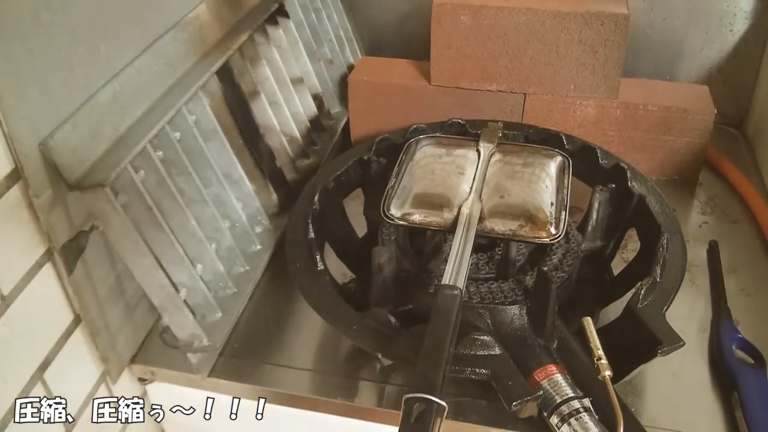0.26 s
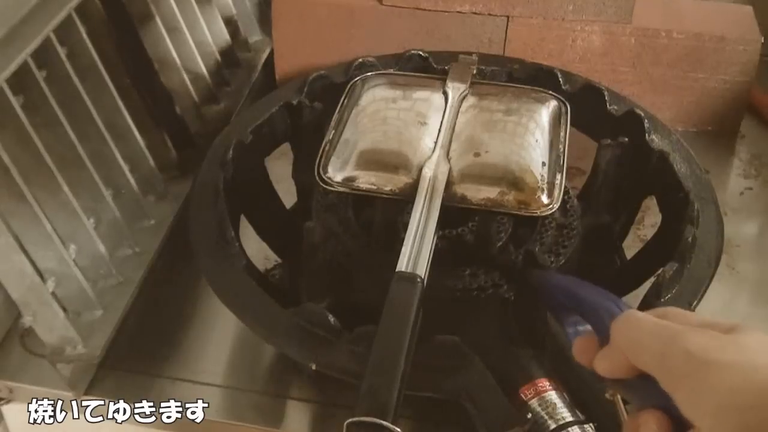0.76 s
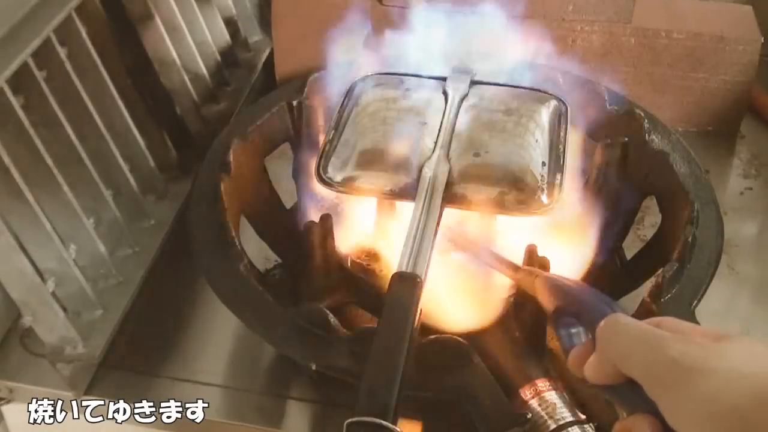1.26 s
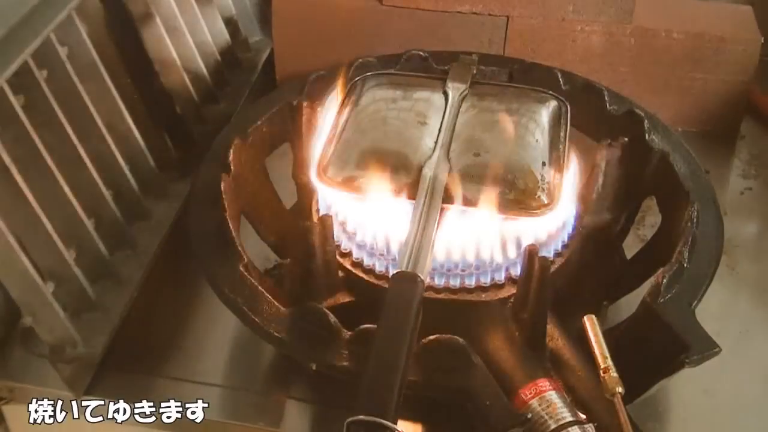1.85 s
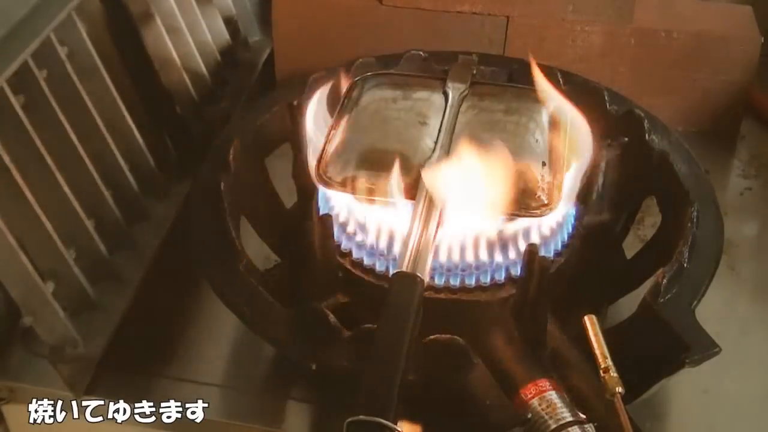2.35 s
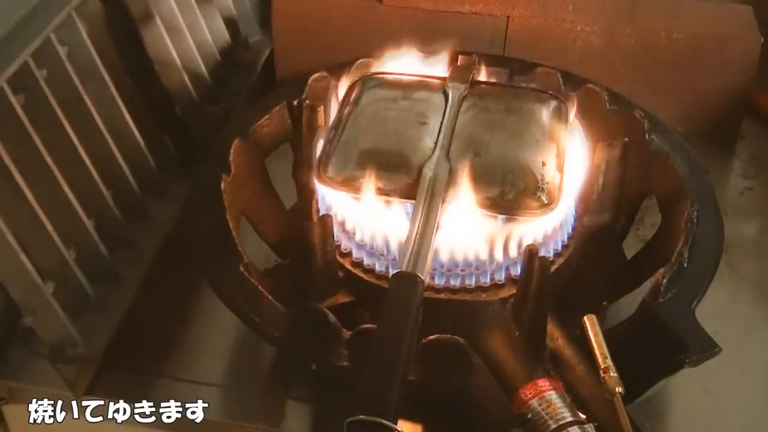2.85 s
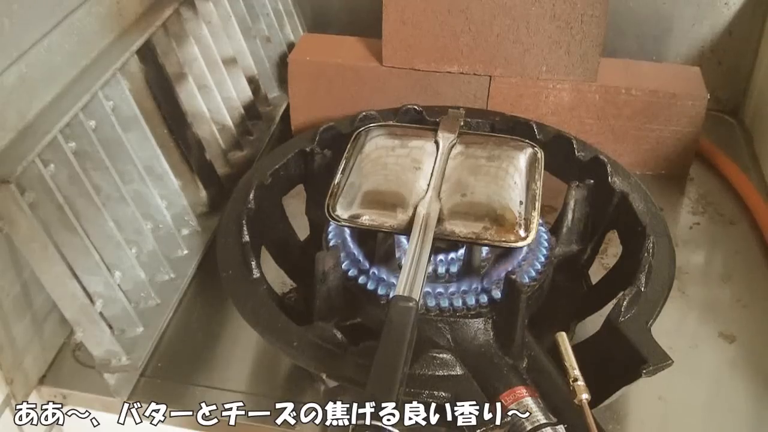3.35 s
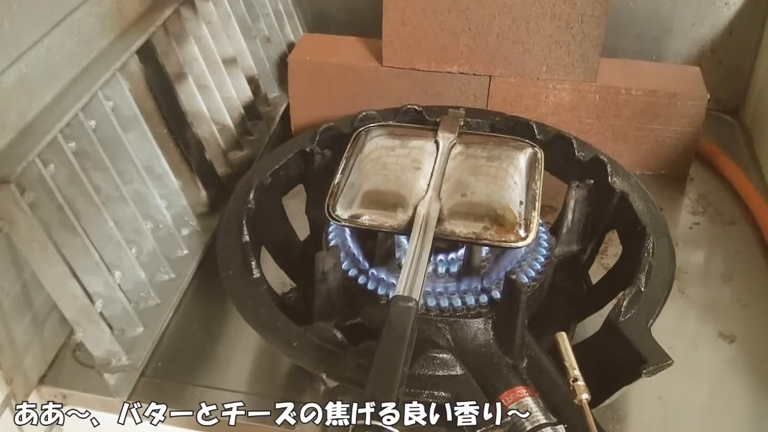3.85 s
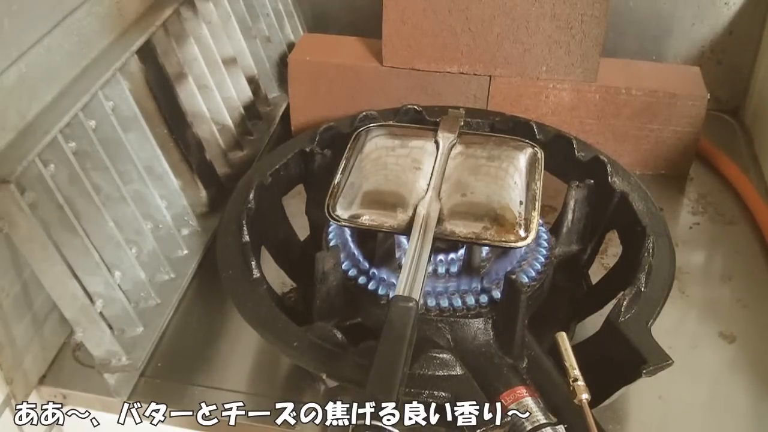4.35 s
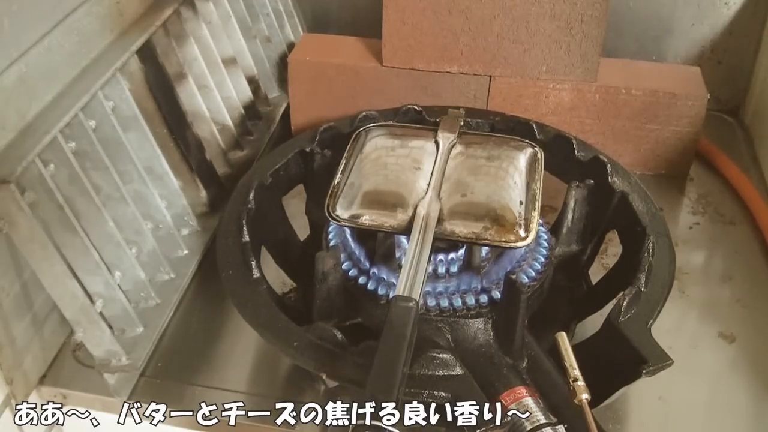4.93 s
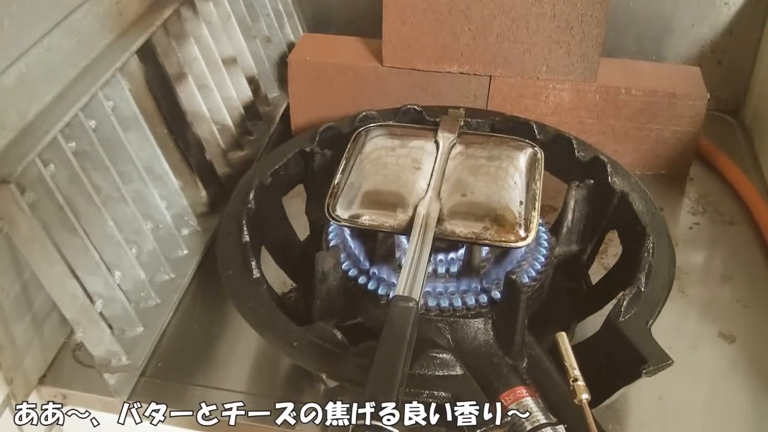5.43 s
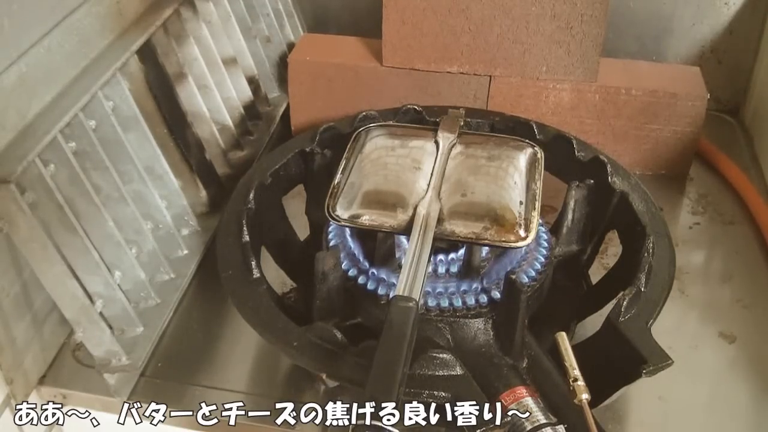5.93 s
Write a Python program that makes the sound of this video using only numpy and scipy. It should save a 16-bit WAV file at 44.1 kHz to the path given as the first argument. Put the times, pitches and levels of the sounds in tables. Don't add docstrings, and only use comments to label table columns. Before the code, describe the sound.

Light taps and an iron press set down, three sharp lighter snaps, gas catching with a whoomp and fluttering, then crackling frying.

```python
import sys
import numpy as np
from scipy import signal
from scipy.fft import rfft, irfft
from scipy.io import wavfile
from scipy.ndimage import uniform_filter1d

SR = 44100
rng = np.random.default_rng(int(sys.argv[2]) if len(sys.argv) > 2 else 0)


def voltage_ratio(decibels):
    exponent = np.asarray(decibels, float) / 20
    return 10 ** exponent


def store_wav(level_fs):
    pcm = np.round(np.clip(np.atleast_2d(level_fs), -1, 1) * 32767)
    wavfile.write(sys.argv[1], SR, pcm.T.astype(np.int16))


N = 272538

SCENE_CHANGES = [
    .457,
    3.095,
]
VALVE_TURNS = [
    0.51,
    1.685,
]


def rms_one(x):
    return x / np.sqrt(np.mean(x ** 2) + 1e-20)


def in_time(rows, outside=None):
    s, *columns = np.transpose(rows)
    t = np.arange(N) / SR
    return [np.interp(t, s, column, outside, outside) for column in columns]


def at_hz(points, hz):
    points_hz, points_db = np.transpose(points)
    return np.interp(np.log(hz + 1), np.log(points_hz), points_db)


def colour(x, spectrum, size=4096):
    gain = voltage_ratio(at_hz(spectrum, np.fft.rfftfreq(size, 1 / SR)))
    cepstrum = irfft(np.log(gain), size)
    cepstrum[1:size // 2] *= 2
    cepstrum[size // 2 + 1:] = 0
    response = irfft(np.exp(rfft(cepstrum)), size)[:size // 2]
    response = response / np.sqrt(np.sum(response ** 2))
    return signal.oaconvolve(np.atleast_2d(x), response[None], axes=1)[:, :N]


def band(x, low_hz, high_hz):
    sos = signal.butter(2, [low_hz, high_hz], "band", fs=SR, output="sos")
    return signal.sosfilt(sos, x + 1e-18)


def resonance(x, hz, width_hz):
    r = np.exp(-np.pi * width_hz / SR)
    top = np.array([1, 0, -1]) * (1 - r * r) / 2
    bottom = [1, -2 * r * np.cos(2 * np.pi * hz / SR), r * r]
    return signal.lfilter(top, bottom, x + 1e-18)


def drift(rate):
    knots = rng.standard_normal(2000)
    return np.interp(np.arange(N) / SR * rate, np.arange(2000), knots)


def wide(extra_db):
    # (pitch [Hz], level [dB])
    side_spectrum = [(60, -33), (110, -13), (200, -26), (380, -11.5), (700, -11.5), (1290, -11.5),
                     (2380, -13), (4400, -10), (8120, -14), (15000, -53)]
    mid, side = rng.standard_normal((2, N))
    gain = voltage_ratio(at_hz(side_spectrum, np.fft.rfftfreq(N, 1 / SR)) + extra_db)
    return mid + irfft(rfft(side) * gain, N) * [[1], [-1]]


def bursts(times, peak_db, length_ms, scatter, click=1):
    out, t = np.zeros(N + 2000), np.arange(2000) / SR
    for s, db, noise in zip(times, peak_db, rng.standard_normal((len(times), 2000))):
        grain = scatter * noise * np.exp(-t * 1000 / length_ms)
        grain[0] = click
        start = round(s * SR)
        out[start:start + 2000] += voltage_ratio(db) * grain
    return out[:N]


def rings(times, rows):
    out, t = np.zeros(N + SR), np.arange(SR) / SR
    for s, (hz, db, rise_ms, t60) in zip(times, rows):
        swell = 1 - np.exp(-(t * 1000 / rise_ms) ** 2)
        start = round(s * SR)
        out[start:start + SR] += voltage_ratio(db - 60 * t / t60) * swell * np.sin(2 * np.pi * hz * t)
    return out[:N]


def swells(times, peak_db, rise, fall, floor_db=-120):
    late = np.arange(N) / SR - np.array(times)[:, None]
    ramps = np.array(peak_db)[:, None] + np.minimum(late * rise, -late * fall)
    return np.maximum(np.max(ramps, axis=0), floor_db)


def lighter():
    # (time [s], peak level [dB], level of the hollow ring [dB])
    snaps = [
        (0.654, -8, -13),
        (1.0118, -8, -2),
        (1.3237, -7, -3),
    ]
    # (pitch [Hz], level [dB])
    snap_spectrum = [(500, -60), (850, -28.5), (1100, -13.5), (1500, -14.5), (2000, -8), (2600, -4),
                     (3100, -11), (4000, -7), (5500, -6), (7200, -10.5), (8600, -9), (10500, -14.5),
                     (13200, -22.5), (15600, -18), (17200, -36)]
    s, db, body_db = np.transpose(snaps)
    body = bursts(s + 0.000708, db + body_db + 3.0, 0.34, scatter=0.05)
    body = resonance(body, hz=1790, width_hz=1600)
    crack = bursts(s + 0.000695, db + 3.0, 0.7, scatter=0.04)
    return colour(crack + body, snap_spectrum)[0]


def flame():
    # (time [s], rumble level [dB])
    ignition = [
        (1.325, -52),
        (1.345, -20),
        (1.385, -9.5),
        (1.42, -25),
        (1.483, -37.5),
        (1.607, -49),
        (1.633, -102),
    ]
    # (time [s], flap level [dB], pitch [Hz], gust level [dB])
    puffs = [(1.692, -27.5, 166, -33), (1.814, -31, 170, -39.5), (1.841, -30, 71.4, -37.5),
             (1.872, -31, 110, -41), (1.927, -19, 138, -31), (2.065, -25.5, 181, -37.5),
             (2.19, -60, 150, -48), (2.335, -36, 130, -35), (2.378, -30, 110, -35.5),
             (2.409, -38, 150, -37), (2.457, -36, 123, -43), (2.489, -30, 152, -54),
             (2.525, -29.5, 163, -49), (2.551, -26, 170, -39.5), (2.597, -27, 170, -35.5),
             (2.624, -26, 155, -32), (1.946, -36, 150, -34)]
    # (pitch [Hz], level [dB])
    rumble_spectrum = [(15, -59), (25, -43), (46, 2), (81, -14.5), (141, 4), (178, 1), (211, -5.5),
                       (257, -14), (400, -17), (520, -20), (880, -120)]
    # (pitch [Hz], width [Hz], level [dB])
    air_modes = [(76, 13, 9), (130, 22, -16), (295, 25, 7.5), (464, 116, 6), (745, 61, -1)]
    whoomp_times = [1.335, 1.343, 1.36, 1.358, 1.365, 1.378, 1.345, 1.348, 1.342, 1.39, 1.333]
    # (pitch [Hz], level [dB], rise [ms], 60 dB decay [s])
    whoomp_modes = [(170, -10, 12, 0.088), (310.4, -2.5, 28, 0.24), (797, -12.5, 8.3, 0.2),
                    (151, 4, 9, 0.084), (76.2, -15, 44, 0.27), (486, -5.5, 7.7, 0.077), (36, -13, 20, 0.17),
                    (236, -1.5, 6, 0.047), (110, -6, 6, 0.075), (219, -23, 9, 0.28), (411, -15, 4.8, .1)]

    s, _, _, gust_db = np.transpose(puffs)
    clock = np.arange(N) / SR
    burning = (clock > VALVE_TURNS[1]) & (clock < SCENE_CHANGES[1])
    catch_db, = in_time(ignition, outside=-120)
    flutter_db = swells(s + 0.0098, gust_db, rise=600, fall=298, floor_db=-74)
    rumble_db = np.where(burning, flutter_db, catch_db)
    bright_flutter_db = -52 + 1.4 * (flutter_db + 40.0)
    bright_catch_db = -14 + 1.13 * (catch_db + 11.0)
    bright_db = np.where(burning, bright_flutter_db, bright_catch_db)
    rumble = colour(wide(extra_db=-15.0), rumble_spectrum) * voltage_ratio(rumble_db - 3.0 + 4.0 * drift(60))
    surge = rms_one(band(wide(extra_db=0.0), 220, 1140)) * voltage_ratio(bright_db - 3.5 + 2.7 * drift(60))
    modes = sum(voltage_ratio(db) * resonance(rumble + surge, hz, width) for hz, width, db in air_modes)

    flaps, t = np.zeros(N), np.arange(SR // 20) / SR
    for s, db, hz, _ in puffs:
        start = round(s * SR)
        flap = np.sin(2 * np.pi * hz * t) * t * hz * np.exp(-t * hz * 1.0)
        flaps[start:start + len(t)] += voltage_ratio(db + 3.5) * flap

    lean = voltage_ratio(1.4 * (np.arange(N) < 1.6 * SR) * [[1], [-1]])
    boom = modes + rings(whoomp_times, whoomp_modes)
    deep = band(boom, 15, 260)
    return (surge + boom - deep) / lean ** 0.31 + (rumble + flaps + deep) * lean


def gas():
    # (pitch [Hz], width [Hz])
    jets = [(8600, 600), (7290, 300), (747, 250)]
    # (level [dB]), then its change (slope [dB/s])
    seep_levels, seep_slopes = [-56.5, -90, -63], [-13, 6, 6]
    open_levels = [-55.5, -52, -51.5]
    turn_s = 0.028
    out, t = 0, np.arange(N) / SR
    cracked, opened = (np.clip((t - s) / turn_s + .5, 0, 1) for s in VALVE_TURNS)
    for (hz, width), seep_db, slope, open_db in zip(jets, seep_levels, seep_slopes, open_levels):
        seeping = cracked * (1 - opened) * voltage_ratio(seep_db + slope * (t - VALVE_TURNS[0]))
        flow = seeping + opened * (t < SCENE_CHANGES[1]) * voltage_ratio(open_db)
        whistle = resonance(resonance(wide(extra_db=-1.0), hz, width), hz, width)
        out = out + flow * voltage_ratio(0.8 * drift(25.93)) * rms_one(whistle)
    return out


def frying():
    # (time [s], fizz level [dB])
    vigour = [(3.1, -36.5), (3.15, -39.5), (3.28, -39.5), (4.02, -37), (4.24, -39), (4.42, -40),
              (4.89, -37), (5.28, -39), (5.42, -38.5), (5.56, -35.5), (5.69, -38.5), (5.85, -36.5),
              (5.96, -37.5), (6.18, -33.5)]
    # (pitch [Hz], level [dB])
    fry_spectrum = [(530, -28), (900, 2.5), (1340, 1), (2830, 3), (3470, 0.5), (4520, -17.5), (5040, -7.5),
                    (7680, 1), (12600, -3.5), (14500, -2), (16000, -15.5)]
    # (pitch [Hz], width [Hz], level [dB])
    gaps = [(4450, 320, 4), (5750, 280, 2), (7560, 250, 1), (8310, 320, 7), (9720, 200, 4)]
    # (time [s], peak level [dB], level of the top [dB])
    first_bubbles = [(3.1021, -23.0, -17.0), (3.1234, -21.0, -13.0), (3.147, -25.0, -4.0), (3.2222, -20.0, -8.0),
                     (3.2391, -25.0, -12.0), (3.2907, -20.0, -7.0), (3.2942, -20.0, -8.0), (3.3063, -21.0, -18.0),
                     (3.3085, -23.0, -5.0), (3.3164, -23.0, -13.0), (3.3502, -23.0, -11.0), (3.3927, -20.0, -3.0),
                     (3.3976, -24.0, -7.0), (3.4091, -18.0, -7.0), (3.47, -21.0, -12.0), (3.5065, -25.0, -6.0),
                     (3.5602, -23.0, -20.0), (3.5927, -23.0, -14.0), (3.6174, -23.0, -10.0),
                     (3.6196, -11.0, -7.0), (3.6226, -22.0, -6.0), (3.6429, -22.0, -15.0), (3.6451, -22.0, -5.0),
                     (3.6565, -24.0, -7.0), (3.6601, -18.0, -6.0), (3.6685, -18.0, -5.0), (3.674, -24.0, -11.0),
                     (3.6783, -21.0, -11.0), (3.6811, -25.0, -10.0), (3.729, -24.0, -2.0), (3.7357, -24.0, -9.0),
                     (3.7391, -24.0, -8.0), (3.7833, -15.0, -6.0), (3.7956, -24.0, -11.0), (3.8129, -20.0, -25.0),
                     (3.8599, -15.0, -10.0), (3.9037, -16.0, -6.0), (3.9189, -3.0, -16.0), (3.9206, -18.0, -21.0),
                     (3.9596, -21.0, -10.0), (3.9758, -24.0, -12.0), (3.9941, -24.0, -7.0), (4.0043, -21.0, -8.0),
                     (4.011, -22.0, -19.0), (4.0133, -24.0, -8.0), (4.0377, -23.0, -2.0), (4.0554, -24.0, -5.0),
                     (4.0835, -20.0, -12.0), (4.0967, -22.0, -10.0)]
    # (time [s], peak level [dB], level of the top [dB])
    later_bubbles = [(4.0984, -13.0, -8.0), (4.1036, -19.0, -9.0), (4.1741, -14.0, -13.0), (4.222, -21.0, -5.0),
                     (4.2392, -26.0, -5.0), (4.4075, -19.0, -12.0), (4.5195, -20.0, -12.0),
                     (4.5296, -17.0, -13.0), (4.5346, -21.0, -18.0), (4.5487, -19.0, -9.0),
                     (4.5703, -19.0, -14.0), (4.5853, -18.0, -8.0), (4.6407, -18.0, -10.0), (4.6487, -21.0, -8.0),
                     (4.6545, -23.0, -12.0), (4.6896, -25.0, -4.0), (4.7315, -24.0, -6.0), (4.7462, -21.0, -11.0),
                     (4.7619, -25.0, -10.0), (4.7913, -18.0, -6.0), (4.8391, -22.0, -12.0),
                     (4.8631, -19.0, -18.0), (4.9182, -20.0, -11.0), (4.9205, -20.0, -10.0),
                     (4.9573, -22.0, -9.0), (4.9765, -22.0, -3.0), (5.0042, -22.0, -6.0), (5.008, -21.0, -3.0),
                     (5.0163, -25.0, -9.0), (5.0479, -23.0, -6.0), (5.0743, -23.0, -5.0), (5.0875, -13.0, -8.0),
                     (5.1188, -25.0, -5.0), (5.1241, -20.0, -12.0), (5.2052, -23.0, -10.0), (5.2207, -10.0, -5.0),
                     (5.2271, -22.0, -14.0), (5.2379, -23.0, -10.0), (5.2401, -24.0, -6.0),
                     (5.2551, -23.0, -19.0), (5.2574, -19.0, -13.0), (5.2655, -21.0, -10.0),
                     (5.2859, -19.0, -12.0), (5.2881, -23.0, -10.0), (5.2909, -17.0, -5.0), (5.3639, -15.0, -8.0),
                     (5.3774, -22.0, -5.0), (5.4463, -22.0, -21.0), (5.5229, -24.0, -12.0)]
    # (time [s], peak level [dB], level of the top [dB])
    last_bubbles = [(5.537, -17.0, -5.0), (5.5434, -5.0, -6.0), (5.5798, -19.0, -6.0), (5.61, -24.0, -9.0),
                    (5.6161, -24.0, -13.0), (5.6632, -18.0, -12.0), (5.6834, -23.0, -14.0),
                    (5.7092, -21.0, -11.0), (5.7129, -23.0, -11.0), (5.732, -9.0, -9.0), (5.7409, -15.0, 6.0),
                    (5.7455, -21.0, -6.0), (5.7592, -24.0, 1.0), (5.7654, -22.0, -21.0), (5.7791, -17.0, -5.0),
                    (5.7812, -18.0, -9.0), (5.8051, -20.0, -5.0), (5.8081, -24.0, -5.0), (5.8101, -21.0, -5.0),
                    (5.8197, -24.0, -10.0), (5.8229, -18.0, -7.0), (5.8405, -19.0, -8.0),
                    (5.8428, -19.0, -12.0), (5.8523, -20.0, -9.0), (5.8854, -16.0, -4.0), (5.887, -21.0, -11.0),
                    (5.8915, -23.0, -8.0), (5.9032, -20.0, -8.0), (5.9116, -11.0, -7.0), (5.9517, -23.0, -11.0),
                    (5.9757, -22.0, -8.0), (5.9855, -21.0, -9.0), (5.9907, -22.0, -15.0), (5.9934, -20.0, -5.0),
                    (6.0224, -22.0, -4.0), (6.04, -24.0, -10.0), (6.0436, -21.0, -10.0), (6.0584, -17.0, -6.0),
                    (6.062, -14.0, -9.0), (6.0723, -20.0, -9.0), (6.0815, -16.0, -14.0), (6.0899, -19.0, -3.0),
                    (6.0938, -17.0, -6.0), (6.0983, -21.0, -11.0), (6.1108, -7.0, -12.0), (6.1117, -4.0, -8.0),
                    (6.1489, -19.0, -6.0), (6.1643, -23.0, -24.0), (6.1728, -23.0, -14.0),
                    (6.1779, -23.0, -10.0)]

    fizz_db, = in_time(vigour, outside=-120)
    per_s = 1300 * voltage_ratio(5.6 * drift(90))
    sizes = voltage_ratio(9.9 * np.minimum(rng.exponential(1, N), 2.3))
    grains = rms_one(sizes * (rng.random(N) < per_s / SR)) * voltage_ratio(fizz_db - 11.0)

    s, db, top_db = np.transpose(first_bubbles + later_bubbles + last_bubbles)
    main = bursts(s, db + .6, 0.6, scatter=0.09) + grains
    top = bursts(s, db + top_db + 1.5, 0.4, scatter=.12) + voltage_ratio(-12) * grains
    pops = bubble_rings(s, db - 11) + spike(main, 3300, 11000)
    pops += spike(top, 11000, 16500)
    lag = round(.66 * SR / 1000)
    pops[lag:] += voltage_ratio(-12.5) * pops[:-lag]

    bubble_steam = bursts(s + .0004, db - 17, 1.8, scatter=0.6, click=0)
    sputter = band(bubble_steam + steam(), 2900, 15000)
    fizz = wide(extra_db=-6.0) * voltage_ratio(fizz_db - 9.5 + 6.0 * drift(160))
    toned = colour(np.vstack([sputter, fizz]), fry_spectrum)
    rung = toned + voltage_ratio(-9.0) * pops * [[1], [0], [0]]
    toned = toned + sum(voltage_ratio(level_db) * resonance(rung, hz, width) for hz, width, level_db in gaps)
    spread = voltage_ratio(-16.5) * drift(150) * pops * [[1], [-1]]
    return toned[0] + pops, toned[1:] + spread


def bubble_rings(times, peak_db):
    pitch_range = [6500, 9300]
    low_hz, high_hz = pitch_range
    life_cycles = 2.2
    out, t = np.zeros(N + 200), np.arange(200) / SR
    for s, db, share in zip(times, peak_db, rng.random(len(times))):
        hz = low_hz * (high_hz / low_hz) ** share
        start = round(s * SR)
        out[start:start + 200] += voltage_ratio(db) * np.sin(2 * np.pi * hz * t) * np.exp(-t * hz / life_cycles)
    return out[:N]


def spike(x, low_hz, high_hz):
    sos = signal.butter(2, [low_hz, high_hz], "band", fs=SR, output="sos")
    height = signal.sosfiltfilt(sos, np.eye(201)[100]).max()
    return signal.sosfiltfilt(sos, x + 1e-18) / height


def steam():
    # (time [s], rms level [dB], length [ms])
    sputters = [(3.305, -30, 3.3), (3.3846, -33, 3.0), (3.6173, -22.5, 3), (3.6598, -28, 3.0),
                (3.8595, -27, 3.1), (3.9165, -18, 2.8), (3.9562, -36, 4.1), (4.0112, -28, 2.5),
                (4.08, -29, 3.1), (4.099, -23.5, 5.4), (4.173, -32, 2.4), (4.4326, -32, 2.4),
                (4.5152, -34, 5), (4.5282, -26, 3.0), (4.647, -32.0, 4.5), (4.7315, -25.5, 3),
                (4.7912, -29, 2.6), (4.839, -28, 2.9), (4.861, -33.0, 2.9), (4.917, -25.5, 3.5),
                (4.976, -32, 3.6), (5.087, -26, 2.4), (5.205, -29, 3.5), (5.219, -29, 1.8),
                (5.2253, -26, 4.2), (5.2377, -25, 2.2), (5.257, -37, 2.2), (5.2859, -32.0, 3.1),
                (5.3624, -35, 2.5), (5.5058, -28, 2.6), (5.5447, -29, 2.5), (5.6149, -36, 4.1),
                (5.662, -32.5, 11), (5.7297, -24, 3.4), (5.7416, -29, 2.2), (5.778, -28, 3.5),
                (5.8095, -37, 2.6), (5.8213, -28, 3.2), (5.8453, -30, 2.5), (5.886, -37, 3.0),
                (5.8994, -29.5, 3.7), (5.9107, -37, 2.5), (6.06, -39, 2.5), (6.0887, -28, 2.0)]
    level, ms = np.zeros(N + SR), np.arange(2000) * 1000 / SR
    for s, db, length_ms in sputters:
        rise_db, fall_db = 17 * (ms - 1), -11.5 * (ms - length_ms)
        shape_db = np.minimum(0, np.minimum(rise_db, fall_db))
        start = round(s * SR) + 25
        level[start:start + 2000] += voltage_ratio(db - 4 + shape_db)
    return level[:N] * rng.standard_normal(N)


def knocks():
    # (time [s], peak level [dB])
    finger_taps = [(0.101, -44), (0.117, -38), (0.122, -37), (0.136, -32), (0.143, -36), (0.152, -30),
                   (0.199, -34), (0.239, -33), (0.249, -30), (0.3, -21), (0.31, -27)]
    # (time [s], thud [dB], clack [dB], tick [dB], clack pitch [Hz])
    iron_knocks = [(0.269, -57, -48, -27, 886), (0.315, -42, -23, -17, 1440),
                   (0.3212, -39, -7, -12.5, 1500), (0.461, -64, -27, -18.5, 1050),
                   (0.535, -51, -28, -29, 1760), (0.841, -52, -17, -8.5, 1630),
                   (0.873, -42.5, -29, -19, 2220), (0.923, -45, -36, -47, 925),
                   (1.172, -43.5, -17, -18, 2900), (1.179, -42.5, -8.5, -7.5, 1620),
                   (1.437, -39, -6, -14, 2730), (1.487, -37.5, -25, -10, 1680),
                   (1.557, -63, -22, -35, 4700), (1.667, -69, -46, -40, 5000),
                   (1.962, -42.5, -34.5, -35, 1630), (2.606, -44, -41, -28.5, 859),
                   (3.859, -44, -29, -13.5, 1500), (3.918, -48, -15, -37, 1570),
                   (3.956, -41.5, -29, -28, 920), (4.004, -45.5, -28.5, -19.5, 1270),
                   (4.131, -30.5, -4.5, -10, 2190), (4.7235, -46, -24, -37, 1090),
                   (4.731, -44, -26, -48, 1010), (4.74, -45.5, -24, -50, 950),
                   (5.254, -46.5, -28, -24, 990), (6.1099, -25.5, -13, -7, 990),
                   (6.171, -43, -14, -14, 1010)]
    ring_times = [.265, .322, .35, .84, .875, 1.18, 1.19, 1.49, 4.1315, 6.11, 6.111, 4.1315, 4.1315, .316,
                  .24, .462, 6.111, 6.111, 6.111, 4.1315, 4.1315, 6.111, 1.015, 1.327]
    # (pitch [Hz], level [dB], rise [ms], 60 dB decay [s])
    ring_modes = [(237, -30.5, 9.8, 0.11), (250, -26, 2.2, 0.098), (320, -26, 5.1, 0.069),
                  (880, -20.5, 2.4, 0.027), (367, -38.5, 10, 0.44), (915, -22.5, 3.2, 0.046),
                  (346, -33, 11, 0.14), (410, -41, 12, 0.8), (511, -12.5, 1.3, 0.023),
                  (177, -21.5, 6, 0.11), (2160, -11, 0.3, 0.011), (2780, -8.5, 1.5, 0.033),
                  (2450, -17, 0.52, 0.02), (7040, -19.5, 1, 0.023), (6800, -27, 1.2, 0.02),
                  (5400, -27, 2.5, 0.033), (3340, -10.5, 0.96, 0.019), (530, -16.5, 1.4, 0.022),
                  (277, -31, 3, .1), (161, -29, 2.1, 0.088), (1370, -30, 1.1, 0.017), (1500, -19, .8, .03),
                  (2450, -24, 25, 0.11), (2300, -18, 22, 0.12)]

    taps = [(s, db - 27, db - 7, db, 6550) for s, db in finger_taps]
    s, thud_db, clack_db, tick_db, clack_hz = np.transpose(sorted(taps + iron_knocks))
    s = s + 0.00067
    thud = band(bursts(s, thud_db + 33.0, 7.2, scatter=0.28), 210, 1230)
    tick = bursts(s, tick_db + 1.5, 7.1, scatter=0.41, click=0.49)
    tick = band(band(tick, 1600, 7800), 1330, 15500)
    blows = bursts(s, clack_db + 19.5, 3.5, scatter=0.13, click=0.9)
    clack = np.zeros(N)
    starts = np.round(s * SR).astype(int)
    for start, end, hz in zip(starts, [*starts[1:], N], clack_hz):
        once = resonance(blows[start:end], hz, 0.65 * hz)
        clack[start:end] = resonance(once, hz, 0.75 * hz)
    return thud + clack + tick + rings(ring_times, ring_modes)


def shivers():
    # (time [s], rms level [dB], low pitch [Hz], high pitch [Hz], 60 dB decay [s])
    loose_parts = [
        (4.133, -35, 1700, 3100, .22),
        (6.112, -30, 250, 3600, .2),
        (0.323, -37, 900, 3300, .3),
    ]
    out, t = 0, np.arange(N) / SR
    for s, db, low_hz, high_hz, t60 in loose_parts:
        level_db = db - 60 * np.maximum(t - s, 0) / t60 + 3.0 * drift(200)
        rattle = rms_one(band(wide(extra_db=-8.0), low_hz, high_hz))
        out = out + (t > s) * voltage_ratio(level_db) * rattle
    return out


def rustle():
    # (time [s], peak level [dB])
    moves = [(0.31, -27), (0.345, -26), (0.475, -30), (0.68, -51), (0.898, -29.5), (1.13, -31.5),
             (1.25, -30.5)]
    # (pitch [Hz], level [dB])
    rub_spectrum = [(120, -17), (200, -0.5), (227, -12.5), (440, 0), (519, -15), (836, -2), (916, -3.5),
                    (6760, -12), (11500, -21), (16000, -49)]
    level_db = swells(*np.transpose(moves), rise=115, fall=140)
    return colour(wide(extra_db=1.5), rub_spectrum) * voltage_ratio(level_db - 12.0 + 0.57 * drift(53.5))


def air():
    # (pitch [Hz], level [dB])
    fan_tones = [(236.9, -59.5), (296.1, -66.5), (468.3, -66.5), (710.6, -66), (1007, -63), (1184, -66.5)]
    # (pitch [Hz], level [dB])
    room_spectrum = [(15, -42), (25, -1), (229, -1.5), (427, -1.5), (818, -1.5), (1290, -4.5), (2410, -2),
                     (2840, -7.5), (5000, -9), (6740, -10), (7310, -19), (7920, -5.5), (8590, -12),
                     (9320, -10.5), (16000, -21.5)]
    room_shot_db, fan_shot_db = [-4, -2.5, -2], [0.5, 0.5, 4]
    t = np.arange(N) / SR
    shot = np.searchsorted(SCENE_CHANGES, t)
    hum = 0
    for hz, db in fan_tones:
        steady = 1.01 * np.sin(2 * np.pi * hz * t)
        unsteady = 0.52 * rms_one(resonance(wide(extra_db=12.0), hz, 0.5))
        hum = hum + voltage_ratio(db) * (steady + unsteady)
    room = band(colour(wide(extra_db=1.5), room_spectrum), 42, 20000)
    room = room + voltage_ratio(2.5) * resonance(room, 61.0, 6.1)
    room_db = -45 + np.array(room_shot_db)[shot] + .6 * drift(20)
    return room * voltage_ratio(room_db) + hum * voltage_ratio(np.array(fan_shot_db)[shot])


def kitchen(x):
    # (pitch [Hz], 60 dB decay [s])
    decay_times = [(125, 0.17), (500, 0.38), (2000, 0.36), (6000, 0.34), (15000, 0.28)]
    fill_s = 0.0025
    t = np.arange(SR // 2) / SR
    noise, hz = rfft(wide(extra_db=1.5)[:, :len(t)]), np.fft.rfftfreq(len(t), 1 / SR)
    tail, edges = 0, 60 * 2 ** np.arange(0, 8.6, 1 / 3)
    for low, high in zip(edges, edges[1:]):
        piece = irfft(noise * (hz >= low) * (hz < high), len(t))
        decay = voltage_ratio(-60 * t / at_hz(decay_times, np.sqrt(low * high)))
        fill = 1 - np.exp(-t / fill_s * max(low / 2500, 1) ** 4)
        tail = tail + piece * decay * fill
    tail = tail * voltage_ratio(1.5 * drift(297.6)[:len(t)])
    tail = tail / np.sqrt(np.mean(np.sum(tail ** 2, axis=1)))
    return signal.oaconvolve(x[None], tail, axes=1)[:, :N]


def scene():
    crack, hits, (spit, fizz) = lighter(), knocks(), frying()
    wet = kitchen(voltage_ratio(26.5) * crack + voltage_ratio(-9.5) * hits + voltage_ratio(-8.0) * spit)
    return crack + hits + spit + wet + fizz + shivers() + rustle() + flame() + gas() + air()


def band_limit(x):
    return signal.sosfilt(signal.butter(12, 17000, fs=SR, output="sos"), x)


def record(dry):
    t = np.arange(N) / SR
    power = np.mean(band(dry, 260, 18000) ** 2, axis=0)
    power = signal.lfilter([.004], [1, -.996], power)
    over_db = np.maximum(10 * np.log10(power + 1e-12) + 13, 0)
    limited = dry * voltage_ratio(-.9 * over_db)
    fade_s = .006
    for s in SCENE_CHANGES:
        limited = limited * np.clip(np.abs(t - s) / fade_s, .15, 1)
    limited = 1.05 * np.tanh(limited / 1.05)
    low_pass = signal.ellip(12, .2, 60, 15750, fs=SR, output="sos")
    low = signal.sosfiltfilt(low_pass, limited)
    top_pass = signal.ellip(8, .2, 60, 16900, fs=SR, output="sos")
    top = signal.sosfiltfilt(top_pass, limited - low)
    near = uniform_filter1d(1. * (np.abs(top[0]) > .045), size=300) > .002
    sharp = uniform_filter1d(near, size=60, output=float)
    return band_limit(low + sharp * top)


dry = scene()
out = record(dry)
store_wav(out)
```